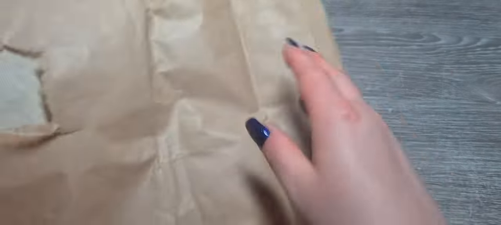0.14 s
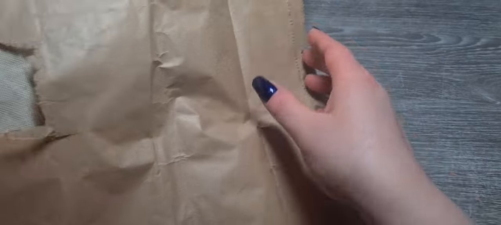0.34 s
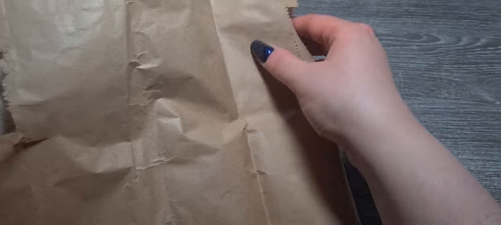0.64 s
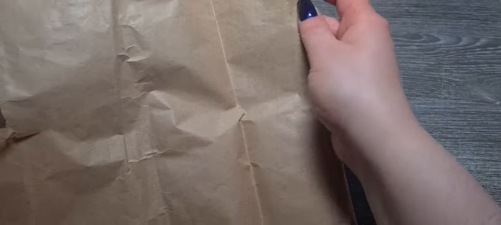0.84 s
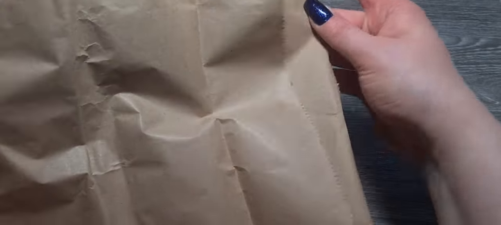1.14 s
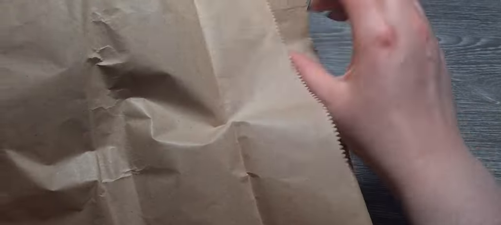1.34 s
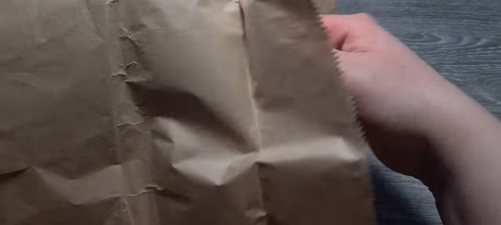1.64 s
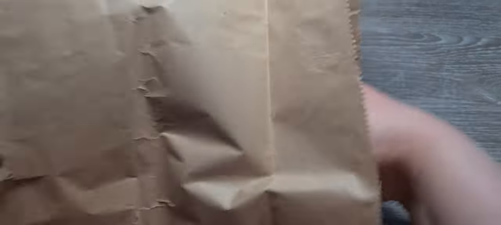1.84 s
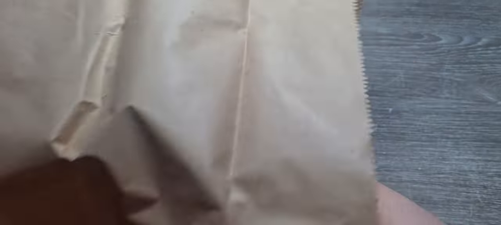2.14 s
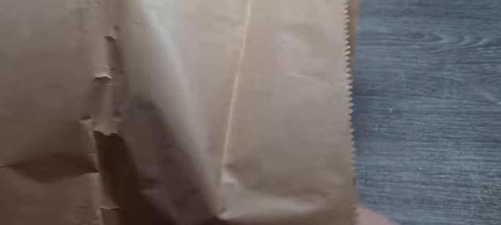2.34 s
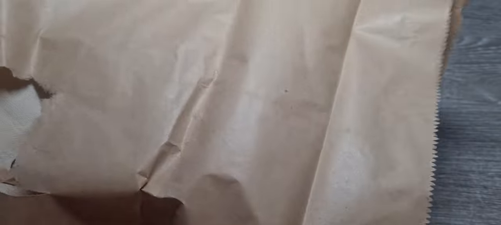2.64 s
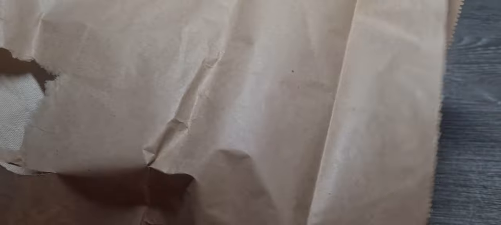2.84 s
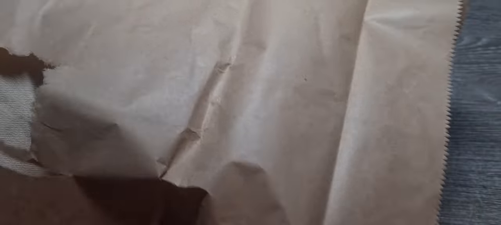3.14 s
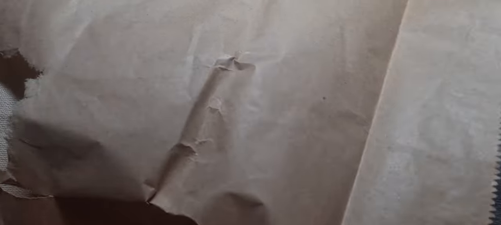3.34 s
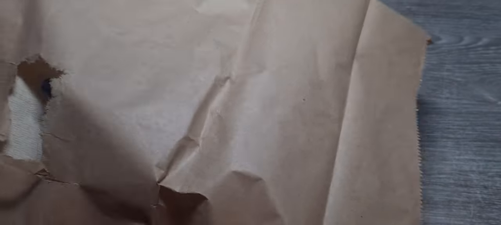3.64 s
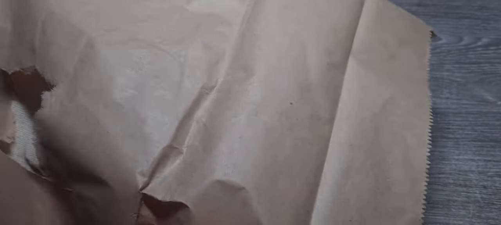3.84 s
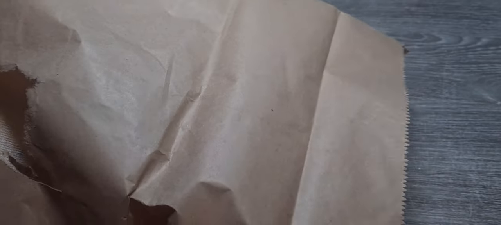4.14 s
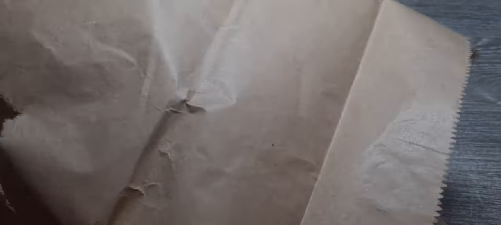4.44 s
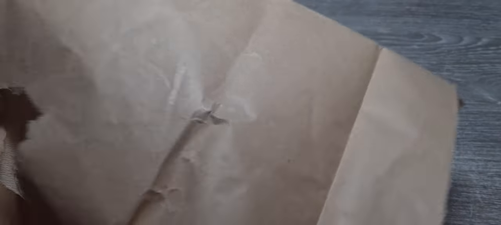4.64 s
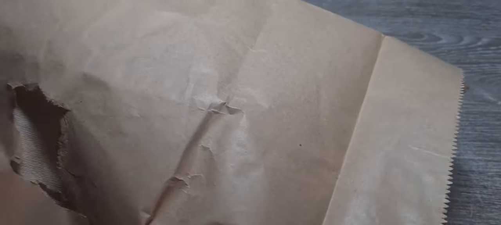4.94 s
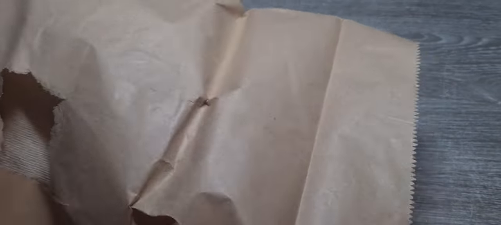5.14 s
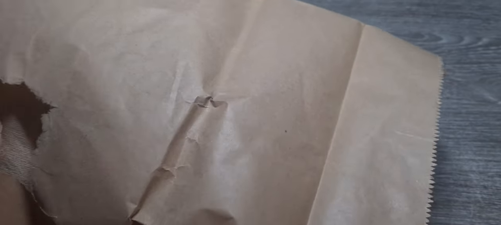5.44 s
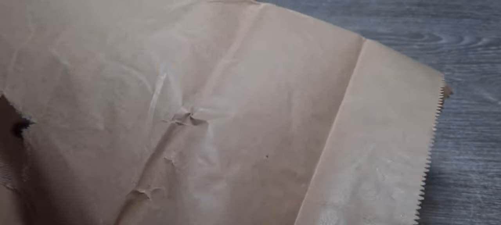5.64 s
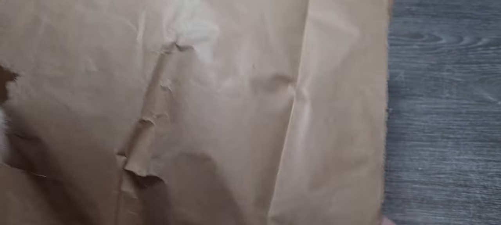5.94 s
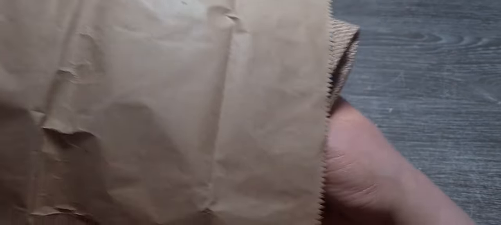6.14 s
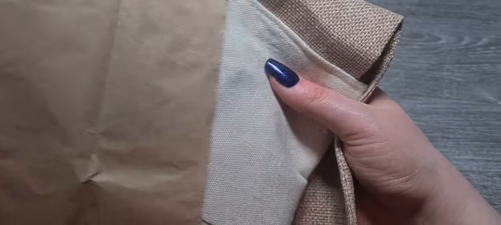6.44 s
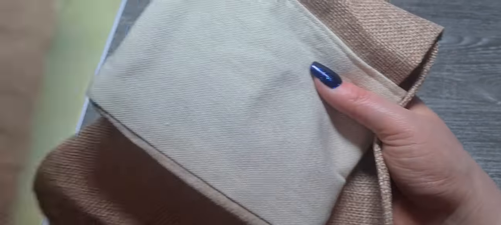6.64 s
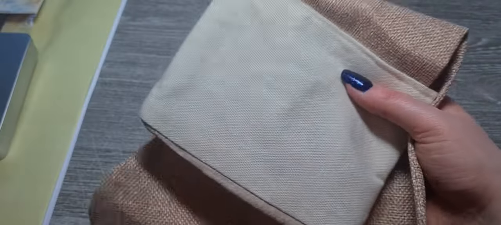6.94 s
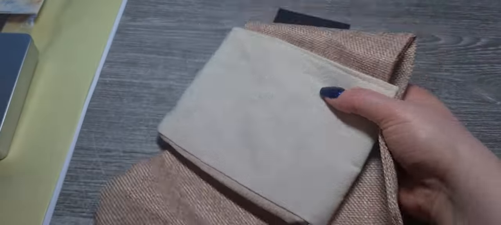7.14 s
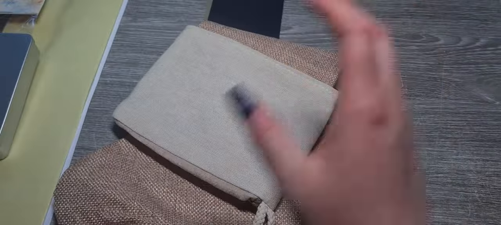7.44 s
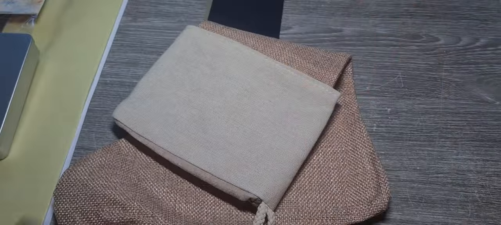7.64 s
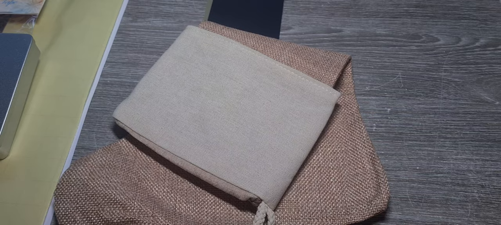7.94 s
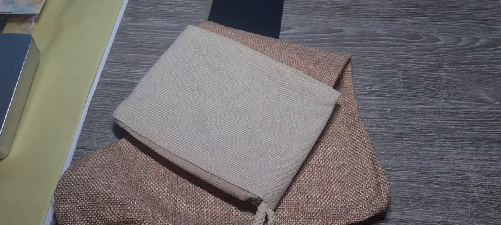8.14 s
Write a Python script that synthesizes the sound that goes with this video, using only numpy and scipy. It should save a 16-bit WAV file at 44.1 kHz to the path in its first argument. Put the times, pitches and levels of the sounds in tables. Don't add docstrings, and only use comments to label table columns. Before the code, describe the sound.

Hands handle a stiff brown paper bag up close, crinkling and snapping loudly, then slide it off a cloth pouch and drop it aside.

```python
import sys
import numpy as np
from scipy import signal
from scipy.fft import rfft, irfft, next_fast_len
from scipy.io import wavfile
from scipy.ndimage import uniform_filter1d

SR = 44100
rng = np.random.default_rng(int(sys.argv[2]) if len(sys.argv) > 2 else 0)


def voltage_ratio(decibels):
    exponent = np.asarray(decibels, float) / 20
    return 10 ** exponent


def inscribe(sig):
    pcm = np.round(np.clip(np.atleast_2d(sig).T, -1, 1) * 32767)
    wavfile.write(sys.argv[1], SR, pcm.astype(np.int16))


N = 365796
SIZE = next_fast_len(N + SR // 2)
HZ = np.maximum(np.fft.rfftfreq(SIZE, 1 / SR), 1)
LOG_HZ = np.log(HZ)

# peak_s, crackle_db, rise_s, fall_s, hollow_body_db
OPENING_PUSHES = [(0.0, -38.5, .1, 0.51, 0), (0.145, -31, 0.0096, 0.099, -2),
                  (0.258, -36.5, 0.016, 0.069, 4.5), (0.428, -40.5, 0.052, 0.044, -4),
                  (0.525, -44.5, 0.088, 0.34, -1), (0.68, -41.5, 0.074, 0.094, 0),
                  (0.763, -43.5, 0.14, 0.057, -20), (0.866, -41, 0.018, 0.15, -0.5),
                  (1.071, -55, 0.048, 0.15, -4), (1.144, -40, 0.023, 0.42, 6.5),
                  (1.165, -28.5, 0.005, 0.16, -24), (1.199, -30, 0.046, 0.087, -1.5),
                  (1.38, -27, 0.037, 0.069, -0.5), (1.545, -42.5, 0.22, 1, 3.5)]
# peak_s, crackle_db, rise_s, fall_s, hollow_body_db
SEARCHING_PUSHES = [(1.825, -30, 0.077, 0.13, 1.5), (2.072, -30.5, 0.15, 0.33, 1.5),
                    (2.27, -31.5, 0.15, 0.036, 2.5), (2.388, -28, 0.071, 0.032, -12),
                    (2.52, -38, 0.74, 0.072, 3), (2.66, -37.5, 0.24, 0.19, 2),
                    (2.934, -34.5, 0.081, 0.1, -1), (3.07, -44, 0.88, 0.3, -21),
                    (3.208, -36.5, 0.28, 0.099, -1.5), (3.43, -44, 1, 0.23, 7.5),
                    (3.647, -32.5, 0.37, 0.2, 3), (3.919, -34, 0.14, 0.25, 2.5),
                    (4.043, -36, 0.19, 0.024, 7.5), (4.132, -33, 0.27, 0.05, 2), (4.2, -52, .06, 0.057, 8),
                    (4.313, -37, 0.014, 0.34, 6), (4.375, -39.5, 0.27, 0.2, -0.5),
                    (4.505, -34, 0.013, 0.16, 0.5), (4.584, -30.5, 0.13, 0.14, 7),
                    (4.722, -37.5, 0.054, 0.04, 8), (4.821, -35, 0.11, 0.21, 3),
                    (5.12, -24, 0.09, 0.085, 0), (5.32, -27, 0.083, 0.045, 2), (5.39, -38, 0.96, 0.18, 6),
                    (5.51, -45, 0.36, 0.3, 5), (5.745, -42.5, 0.079, .04, 2.5),
                    (5.617, -38, 0.074, 0.19, 3)]
# peak_s, crackle_db, rise_s, fall_s, hollow_body_db
SETTLING_PUSHES = [(6.79, -55.5, 0.1, 0.034, 13), (6.884, -48.5, 0.027, 0.021, 15.5),
                   (6.991, -27, 0.026, 0.012, -8), (7.06, -41, 0.48, 0.12, 4),
                   (7.163, -42.5, 0.14, 0.095, 7.5), (7.272, -35.5, 0.037, 0.18, 2.5),
                   (7.56, -57.5, 0.9, 0.08, 1), (7.626, -48, 0.005, 0.44, 6), (7.7, -42, 0.11, 0.071, 6),
                   (7.77, -38, 0.14, 0.048, -3), (7.816, -44, .005, 0.033, -10),
                   (7.946, -45.5, 0.005, 0.54, -6.5), (8.053, -35.5, 0.005, 0.11, -6),
                   (8.203, -33, 0.1, 0.064, -6.5)]
PUSHES = OPENING_PUSHES + SEARCHING_PUSHES + SETTLING_PUSHES
# time_s, crackle_db, hollow_body_db
SLIDE_STROKE = [
    (5.73, -76, -3),
    (5.765, -41.5, -9),
    (5.79, -34.5, -2.5),
    (6.235, -33, 2),
    (6.41, -41.5, -4),
    (6.595, -37.5, -7.5),
    (6.73, -54.5, -1.5),
    (6.8, -87, 4),
]
# time_s, coarseness_db, lower_mids_db
GRAIN_COARSENESS = [
    (5.74, 2.7, 0),
    (5.78, .4, 0),
    (6.6, .4, 0),
    (6.75, 2.6, -8),
]
# time_s, left_minus_right_db, facing_ports_db
BAG_PLACE = [(0.0, 0, -5), (0.02, 4.5, -6), (1.85, 1.5, -6), (3.49, 3, -6), (4.06, 1.5, -7),
             (4.96, 2.5, -7), (5.06, 1, -6.5), (5.75, 3.5, -4.5), (6.39, 2.5, -0.5), (6.86, 4.5, -10.5),
             (7.69, 5, -8), (8.29, 2, -8.5)]

# peak_s, crack_db, left_minus_right_db, length_ms
DRY_CRACKS = [(0.024, -35, 3, 1.8), (0.0681, -26, 5, 1.6), (0.1548, -41, 1, 1.4),
              (0.5164, -17.5, 3.5, 1.1), (1.068, -42, 7, 0.58), (1.2214, -23, -5, 2.7),
              (1.56, -31, 8, 0.95), (1.769, -21.5, 7, 4.9), (1.8262, -13.5, 3, 4.3), (1.853, -22.5, 8, 6),
              (2.079, -19.5, 5, 3.2), (2.1033, -26.5, 8, 3.1), (2.1173, -22, 12, 1.8), (2.135, -17, 5, 4),
              (2.21, -25, 5, 3.5), (2.241, -21.5, 7, 2.8), (2.273, -23, 8, 1.3), (2.3172, -25, 7, 0.62),
              (2.375, -25.5, 9, 7), (2.398, -20.5, 9.5, 2.9), (2.9234, -14, 9.5, 1.34),
              (3.0977, -34, -1, 2.9), (3.2905, -36, 11, 1.5), (3.3676, -19, 2.5, 2.8),
              (3.4354, -28.5, 12, 2.3), (3.6081, -16.5, 7, 1.9), (3.625, -37, -1, .7),
              (3.6887, -33, -1, 1.8),
              (3.9152, -22.5, 9, 2.3), (3.944, -24.5, 1, 3.9), (3.9566, -22.5, 2, 3.4),
                (4.027, -11, 1, 1), (4.272, -24.5, 8, 1.6), (4.376, -24.5, 8.5, 3.2),
                (4.593, -22.5, 5, 3.5), (4.697, -28, 5, .61), (5.5612, -26, 8, 3.4), (5.6735, -38, 12, .7),
                (5.6992, -21, 9, 0.41), (5.8996, -23, 10.5, 1.6), (5.9582, -30, -9, .4),
                (6.557, -36, 5, 2.9), (6.719, -31, 6, 0.31), (6.739, -42, 13, 2.2), (6.775, -43, 8, 4.7),
                (6.873, -42, 18, 1), (6.921, -32, 15, 1.5), (6.948, -25.5, 12, 1), (6.9563, -19.5, 9, 1.9),
                (7.394, -19.5, 8, 2.1), (7.536, -53, 17, 1.7), (7.588, -49, 24, 1.3),
                (7.6647, -29.5, 12, 2.5), (7.735, -33, 14, 0.93), (7.814, -22.5, 1, 0.52),
              (0.4376, -37, 5, 1.3), (.737, -34, -2, 1), (1.1348, -36, 1, 1.8), (1.257, -34, 4, 1.4),
               (1.988, -36, 6, 1.8), (2.0067, -30, 1, 1.2), (2.1695, -27, 17, 1.2), (2.295, -24, 0, 1.5),
               (2.5141, -30, 5, 1.8), (2.7208, -32, 3, 0.86), (3.021, -30, 12, 1.4), (3.4449, -39, 1, 1.2),
               (3.567, -24.5, 4, 1.9), (3.891, -40, 5, 1.5), (4.575, -20.5, 2, 1.6), (4.581, -24, 5, 1.4),
               (4.67, -34, 3, 1.7), (4.736, -33, 3, 1.2), (5.05, -45, -8, 1.3), (5.284, -25, 2, 5.6),
               (5.405, -33, 5, 1.4), (5.629, -31, 11, 0.67), (5.7228, -33, 0.5, 1), (6.835, -42.5, 15, 1.3),
               (7.12, -32, 9, 2.8), (7.161, -35, 5, 2.5), (7.301, -37, 7, 1), (7.6767, -30, 15, 1.1),
               (7.694, -32.5, 13, 0.84), (7.756, -28, 7, 1.1), (7.996, -39, 3, 1.7)]
# peak_s, crack_db, left_minus_right_db, length_ms
PANEL_KNOCKS = [(0.04, -21.5, -1, 0.38), (0.6932, -33.5, -8, 1.5), (0.8652, -27.5, 5, 5),
                (1.1633, -29, 9, 2), (1.3816, -21, 0, 3.3), (1.719, -31, 6, 5), (1.877, -35, 17, 3.6),
                (1.993, -28, -4, 3), (2.0584, -16, 4, 3.5), (2.284, -24, 10.5, 6.4), (2.326, -25.5, 7, 2),
                (2.4246, -24, 0, 0.63), (2.9438, -20, 9, 1.3), (3.352, -23.5, 12, 0.41),
                (3.6487, -24, 1, 1.2), (3.999, -26.5, -1, 6.5), (4.0397, -17, 3, 4.4),
                (4.0905, -26.5, -10, 1.6), (4.5361, -28, 7.5, 7.2), (4.7199, -29, 9, 3.8),
                (5.4237, -26, 2.5, 4.6), (5.7166, -27, 16, 0.52), (6.6712, -28, 8.5, 2.3),
                (7.6405, -31, 15, 0.58), (8.147, -39, 17, 2.8), (8.168, -27, 8, 4.2), (8.206, -21, 1, 0.3),
                (8.219, -27.5, 7, 1.7)]
# peak_s, crack_db, left_minus_right_db, length_ms
BAG_THUMPS = [(0.1016, -32, 6, 5.9), (0.1382, -25.5, 5, 4.1), (0.208, -31.5, 3, 3.6),
              (0.411, -35, 11, 0.48), (1.2881, -24.5, 3, 0.89), (1.8159, -12, 9.5, 1.7),
              (1.9362, -22, 1, 4.8), (2.037, -24, 10, 1.1), (2.0425, -22, -3, 1.2), (2.2173, -19, 9, 2.9),
              (2.727, -28, 7, 1.3), (2.753, -25, 6, 0.68), (2.7685, -36, 5, 5.6), (3.1412, -26, 9, 2.3),
              (3.512, -24, 7, 0.66), (4.244, -31, 1, 4.3), (4.5477, -38, 7, 2.1), (4.8142, -20.5, 3, 2.2),
              (4.9858, -34.5, 10, 0.56), (5.1045, -35, 6, 7.4), (5.134, -27, 6, 1.9), (5.153, -25, 3, 7),
              (5.177, -25.5, -2, 2.9), (5.3207, -29, 12, 4.4), (5.611, -27.5, 6, 4.8),
              (7.0284, -30.5, 7, 2.5), (7.225, -36, 5, 4.8), (7.361, -28.5, 4, 1.1)]
DRY_SNAPS = DRY_CRACKS
EVERY_SNAP = DRY_SNAPS + PANEL_KNOCKS + BAG_THUMPS
# peak_s, centre_hz, emphasis_db
CREASE_PITCH = [(0.024, 2000, 11), (0.04, 4750, 10), (0.101, 8120, 6), (0.138, 4100, 7),
                (0.438, 5240, 11), (0.517, 5470, 4.5), (1.135, 2000, 10), (1.171, 10570, 9),
                (1.222, 11530, 11), (1.256, 3150, 8), (1.381, 5720, 4), (1.56, 6140, 17),
                (1.816, 12500, 6), (1.827, 11400, 6), (1.854, 13740, 4), (1.876, 6820, 8),
                (1.936, 3030, 2), (2.007, 6250, 4), (2.042, 7400, 15), (2.059, 7800, 8),
                (2.079, 8120, 11), (2.105, 4930, 6), (2.116, 6820, 3), (2.135, 6820, 3.5),
                (2.21, 2000, 6), (2.24, 9600, 6), (2.273, 6250, 7), (2.295, 10570, 7),
                (2.316, 5240, 4), (2.426, 1700, 22), (2.514, 2600, 15), (2.721, 15000, 9),
                (2.753, 10570, 5), (2.945, 4800, 5.5), (3.02, 9100, 7), (3.096, 8120, 7),
                (3.14, 6860, 5), (3.351, 1990, 15), (3.367, 7150, 5),
                (3.435, 8120, 5.6), (3.445, 4030, 6), (3.511, 7440, 7.7), (3.608, 13740, 3.1),
                      (3.625, 13740, 10), (3.69, 5720, 8), (3.891, 2600, 5), (3.915, 7600, 4),
                      (3.956, 10570, 13), (4.002, 8120, 3.3), (4.026, 3100, 5.8), (4.09, 5240, 3.1),
                      (4.271, 15000, 3.7), (4.375, 2840, 6.3), (4.537, 3970, 5.1), (4.591, 5800, 4.9),
                      (4.697, 5720, 12), (4.721, 3300, 6.1), (4.814, 14900, 9), (5.133, 12590, 9),
                      (5.322, 6250, 7.8), (5.424, 5240, 3.4), (5.674, 3100, 4.5), (5.699, 6500, 3.5),
                      (5.717, 5000, 4.6), (5.958, 11530, 14), (6.555, 6820, 9.2), (6.671, 6400, 5),
                      (6.717, 3380, 14), (6.871, 2380, 14), (6.921, 3720, 7.7), (6.947, 3690, 9.8),
                      (6.956, 15000, 14), (6.987, 3100, 8), (7.028, 2400, 6), (7.225, 2380, 8.2),
                      (7.394, 14700, 10), (7.641, 2000, 6.4), (7.663, 4400, 3.7), (7.676, 1990, 8.9),
                      (7.995, 5000, 3), (7.693, 5720, 3.8), (7.734, 4800, 12), (7.755, 3100, 10),
                      (7.813, 6900, 5), (8.167, 5730, 3.7), (8.204, 7440, 5.7)]

# low_hz, high_hz, grains_per_s, snap_trim_db
CRACK_LAYER = (2170, 14800, 9900, 0.069)
FLEX_LAYER = (624, 1837, 3998, -2.5)
BOOM_LAYER = (39, 870, 1500, 0.46)
# freq_hz, density_db_per_hz
PAPER_COLOUR = [(42, -7.5), (85, -5.5), (168, -1.5), (225, -3.5), (330, -1), (600, -11), (890, -17),
                (1190, -13), (1450, -16), (3300, -1.5), (7350, 0.5), (7950, -7), (8900, -1), (11500, 1.5),
                (14300, -3.5), (15800, -7)]
# freq_hz, likeness_0_to_1
CHANNEL_LIKENESS = [(100, 1.0), (300, 1), (900, 0.65), (1800, 0), (4000, 0), (12000, 0.02)]
# time_s, note_hz, strength_db
HOLLOW_NOTE_PATH = [(0, 1210, 3.5), (.9, 1150, 9), (1.5, 1190, 5), (2.1, 1170, 1.5), (2.9, 1210, -3.5),
                    (3.6, 1130, 0.5), (4.4, 1130, -1.5), (5.3, 1120, -4), (6.2, 1190, 1.5), (6.6, 1270, 2),
                    (6.85, 1470, 1.5), (7.4, 1500, -3.5), (7.7, 1680, -6), (8.29, 1660, 2)]
# centre_s, extra_weight_db, width_s
TABLE_LEANS = [(0.1, -3, .12), (0.6, -6, 0.43), (1.381, -10.5, 0.48), (1.83, 0, .08), (2.3, 4, 0.46),
               (3.4, -6, 0.16), (4.0, 4, 0.13), (4.6, -2, 0.2), (5.15, -3, 0.11), (5.7, -5, 0.21),
               (6.1, 0.5, 0.25), (6.65, 4, 0.08), (7.22, 12.5, 0.098), (8.15, 2, 0.19)]
# start_s, peak_db, pitch_hz
TABLE_THUDS = [(1.815, -43, 62), (2.039, -32, 151), (2.47, -43, 139), (2.63, -59, 55.7), (3.94, -39, 106),
               (4.033, -29.5, 160), (5.11, -50, 45), (6.78, -59, 55), (6.953, -44, 125), (7.115, -50, 52),
               (7.195, -46, 80), (7.261, -42, 70), (7.31, -58, 90), (8.25, -62, 45.8)]
# freq_hz, left_minus_right_db
PORT_DIFFERENCE = [(60, 1.5), (200, -1), (700, 0), (1250, -4), (2200, 1), (3300, 4), (5400, -0.5),
                   (6900, 7.5), (9000, 1), (11500, -4.5), (13000, 3), (15500, -1)]

SWELL_DB, SWELL_BEND = 21, 1.22
# level_re_crackle_db, hollow_body_share, swell_share, change_aside_db
FLEX_ANSWER, BOOM_ANSWER = (-10, 0.73, 1.01, 1.5), (-13, 0.9751, 0.88, -2)
ASIDE_S, STILL_DB = 6.7, -88
# flex_re_crack_db, boom_re_crack_db
CRACK_SHAKES, KNOCK_SHAKES, THUMP_SHAKES = (-15.5, -28), (-7.5, -22), (-7.5, -10)
CREASE_OCTAVES = 0.47
CRACK_T60_S, FLEX_T60_S, BOOM_T60_S = 0.0035, 0.011, 0.035
BREAK_DB = -1
RIGHT_LAG_S, LAG_S_PER_DB = 0.00014, 0.00007
NOTE_WIDTH_HZ, NOTE_SPACING_HZ = 400, 150
ROOM_T60_S, ROOM_DB = 0.12, -7.5
AIR_DB, RUMBLE_DB = -83, -67
THUD_CYCLES = 0.73


def rms_one(x):
    return x / np.sqrt(np.mean(x ** 2) + 1e-20)


def in_time(rows):
    time_s, *columns = np.transpose(rows)
    return [np.interp(np.arange(N) / SR, time_s, column) for column in columns]


def over_hz(points, log_hz=LOG_HZ):
    hz, value = np.transpose(points)
    return np.interp(log_hz, np.log(hz), value)


def drift(rate_hz):
    r = np.exp(-2 * np.pi * rate_hz / SR)
    noise = rng.standard_normal(N + SR)
    return rms_one(signal.lfilter([1], [1, -2 * r, r * r], noise)[SR:])


def panned(x, pan_db):
    return np.array([x * voltage_ratio(pan_db / 2), x * voltage_ratio(-pan_db / 2)])


def shelved(x, kind, edge_hz, gain_db):
    sos = signal.butter(4, edge_hz, kind, fs=SR, output="sos")
    return x + (voltage_ratio(gain_db) - 1) * signal.sosfiltfilt(sos, x)


def handling(answer=(0, 0, 1, 0)):
    re_db, body_share, swell_share, aside_db = answer
    t = np.arange(0, N + 64, 64) / SR
    peak_s, peak_db, rise_s, fall_s, body_db = np.transpose(PUSHES)[..., None]
    away = np.abs(t - peak_s) / np.maximum(np.where(t < peak_s, rise_s, fall_s), 0.005)
    swell_db = swell_share * SWELL_DB * away ** SWELL_BEND
    pushes = voltage_ratio(peak_db + body_share * body_db - swell_db)
    slide_s, slide_db, slide_body_db = np.transpose(SLIDE_STROKE)
    slide = voltage_ratio(np.interp(t, slide_s, slide_db + body_share * slide_body_db))
    power = np.sum(pushes ** 2, axis=0) + slide ** 2 + voltage_ratio(STILL_DB) ** 2
    level_db = 10 * np.log10(power) + re_db + aside_db * (t > ASIDE_S)
    return np.interp(np.arange(N) / SR, t, level_db)


def crackle(per_s, level_db, bunching):
    coarse_db, _ = in_time(GRAIN_COARSENESS)
    size_db = coarse_db * (bunching + np.minimum(rng.exponential(1, N), 3.4))
    sizes = voltage_ratio(size_db) * rng.standard_normal(N)
    buckles = rng.random(N) < per_s * 3 / coarse_db / SR
    grains = sizes * buckles
    usual = np.sqrt(np.abs(uniform_filter1d(grains ** 2, size=SR // 25)) + 1e-12)
    return grains / usual * voltage_ratio(level_db)


def crease_colours(size):
    crease_s, hz, boost_db = np.transpose(CREASE_PITCH)
    apart_s = np.abs(np.transpose(EVERY_SNAP)[0][:, None] - crease_s)
    nearest = np.argmin(apart_s, axis=1)
    listed = np.min(apart_s, axis=1) < 0.004
    bins_hz = np.fft.rfftfreq(size, 1 / SR) + 1
    octaves = np.log2(bins_hz / hz[nearest, None]) / CREASE_OCTAVES
    return voltage_ratio((boost_db[nearest] * listed)[:, None] * np.exp(-octaves ** 2))


def snaps(level_db):
    t = np.arange(-300, 500) / SR
    slips = rng.standard_normal((len(EVERY_SNAP), len(t))) + 3 * (t == 0)
    slips = irfft(rfft(slips) * crease_colours(len(t)), len(t))
    out = np.zeros((2, N + len(t)))
    for (peak_s, _, pan_db, length_ms), db, slip in zip(EVERY_SNAP, level_db, slips):
        length_ms = max(length_ms, 0.3)
        decay_s = length_ms / 1000 * np.where(t < 0, 0.5, 1.0)
        shape = np.exp(-np.abs(t) / decay_s)
        slip = slip / np.sqrt(np.sum((slip * shape) ** 2) / np.sum(shape ** 2))
        tightness = np.sqrt(1 + 0.045 / length_ms)
        at = round(peak_s * SR)
        out[:, at:at + len(t)] += panned(voltage_ratio(db) * tightness * slip * shape, pan_db - 3.0)
    return out[:, 330:N + 330]


def dying_noise(t60_s, size, wait_s=0.0):
    t = np.arange(size) / SR
    fading = voltage_ratio(np.maximum(-60 * t / t60_s, -200)) * (t >= wait_s)
    mid, side = rfft(rng.standard_normal((2, size)) * fading, 2 * size)
    log_hz = np.log(np.fft.rfftfreq(2 * size, 1 / SR) + 1)
    alike = np.clip(over_hz(CHANNEL_LIKENESS, log_hz), 0, 1)
    pair = np.sqrt(1 + alike) * mid + np.sqrt(1 - alike) * side * [[1], [-1]]
    return irfft(pair)[:, :size] / np.sqrt(2 * np.sum(fading ** 2))


def patches(t60_s, count):
    size = round(t60_s * SR)
    rings = np.array([dying_noise(t60_s, size) for _ in range(count)])
    rings[..., 0] += voltage_ratio(BREAK_DB)
    rings = rfft(rings, 2 * size)
    together = uniform_filter1d(np.mean(np.abs(rings) ** 2, axis=0), size=3)
    return irfft(rings / np.sqrt(together))[..., :size]


def sheet(layer, t60_s, level_db, pan_db, snap_db, bunching, count):
    *_, per_s, trim_db = layer
    left, right = panned(crackle(per_s, level_db, bunching), pan_db) + snaps(snap_db + trim_db)
    lag = np.round(LAG_S_PER_DB * SR * in_time(BAG_PLACE)[0]).astype(int)
    right = right[np.maximum(np.arange(N) - lag, 0)]
    slips = np.array([left, right])
    patch = np.repeat(rng.integers(0, count, N // 160 + 1), 160)[:N]
    out = 0
    for k, ring in enumerate(patches(t60_s, count)):
        left, right = slips * (patch == k)
        right = np.roll(right, round(RIGHT_LAG_S * SR * rng.uniform(0.2, 2.0)))
        out = out + signal.oaconvolve([left, right], ring, axes=1)[:, :N]
    return out


def hollow(x):
    hz, strength_db = in_time(HOLLOW_NOTE_PATH)
    out = x
    r = np.exp(-np.pi * NOTE_WIDTH_HZ / SR)
    for centre_hz in np.arange(1000, 2100, NOTE_SPACING_HZ):
        feedback = [1, -2 * r * np.cos(2 * np.pi * centre_hz / SR), r * r]
        rung = signal.lfilter([(1 - r * r) / 2, 0, (r * r - 1) / 2], feedback, x)
        nearness = np.maximum(1 - np.abs(hz - centre_hz) / NOTE_SPACING_HZ, 0)
        out = out + voltage_ratio(strength_db) * nearness * rung
    return out


def table_weight():
    t = np.arange(N) / SR
    return sum(db * np.exp(-((t - centre_s) / width_s) ** 2) for centre_s, db, width_s in TABLE_LEANS)


def coloured(x, layer):
    low_hz, high_hz, *_ = layer
    edges = np.sqrt((1 + (low_hz / HZ) ** 6) * (1 + (HZ / high_hz) ** 6))
    return rfft(x, SIZE) * rms_one(voltage_ratio(over_hz(PAPER_COLOUR)) / edges)


def furnished_room():
    tail = dying_noise(ROOM_T60_S, size=SR // 2, wait_s=0.003)
    room = 1 + voltage_ratio(ROOM_DB) * rfft(tail, SIZE)
    cepstrum = irfft(np.log(uniform_filter1d(np.abs(room) ** 2, size=150)), SIZE)
    cepstrum[:, 0] /= 2
    return room / np.exp(rfft(cepstrum[:, :SIZE // 2], SIZE))


def thuds():
    out = np.zeros(N + SR)
    t = np.arange(SR // 4) / SR
    for start_s, db, hz in TABLE_THUDS:
        turns = t * hz / THUD_CYCLES
        swing = np.e * turns * np.exp(-turns) * np.sin(2 * np.pi * hz * t)
        out[round(start_s * SR):][:len(t)] += voltage_ratio(db) * swing
    return out[:N]


def scene():
    pan_db, facing_db = in_time(BAG_PLACE)
    _, lower_mids_db = in_time(GRAIN_COARSENESS)
    peak_db = np.transpose(EVERY_SNAP)[1]
    shakes = [CRACK_SHAKES] * len(DRY_SNAPS)
    shakes += [KNOCK_SHAKES] * len(PANEL_KNOCKS) + [THUMP_SHAKES] * len(BAG_THUMPS)
    flex_re_db, boom_re_db = np.transpose(shakes)
    bunching = 0.6 * drift(40) + 0.6 * drift(150)

    crack = sheet(CRACK_LAYER, CRACK_T60_S, handling() + 0.057, pan_db - 1.5,
                  peak_db, bunching, count=9)
    flex = sheet(FLEX_LAYER, FLEX_T60_S, handling(FLEX_ANSWER), 1.36 * pan_db,
                 peak_db + flex_re_db, bunching, count=6)
    boom = sheet(BOOM_LAYER, BOOM_T60_S, handling(BOOM_ANSWER), 0.092 * pan_db,
                 peak_db + boom_re_db, bunching, count=3)

    crack = shelved(crack, "high", 7800, facing_db + 4.5)
    crack = crack + voltage_ratio(AIR_DB) * rng.standard_normal((2, N))
    flex = hollow(shelved(flex, "low", 730, lower_mids_db))
    boom = shelved(boom, "low", 148, table_weight())
    rumble = signal.sosfilt(signal.butter(2, 110, fs=SR, output="sos"), rng.standard_normal(N))
    boom = boom + voltage_ratio(RUMBLE_DB) * rumble

    bag = coloured(crack, CRACK_LAYER) + coloured(flex, FLEX_LAYER) + coloured(boom, BOOM_LAYER)
    return irfft(bag * furnished_room(), SIZE)[:, :N] + thuds()


def low_pass(x):
    return signal.sosfilt(signal.butter(12, 17000, fs=SR, output="sos"), x)


def record(dry):
    rounded = 0.9 * np.tanh(dry / 0.9)
    ports = panned(np.ones(len(HZ)), over_hz(PORT_DIFFERENCE))
    steep_top = 1 / (1 + (HZ / 15850) ** 500)
    mix = irfft(rfft(rounded, SIZE) * ports * steep_top, SIZE)[:, :N]
    return low_pass(mix)


dry = scene()
out = record(dry)
inscribe(out)
```